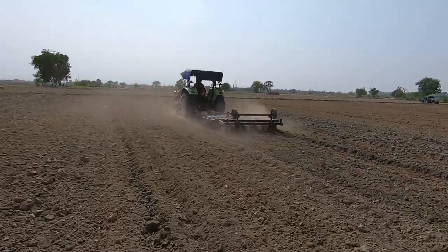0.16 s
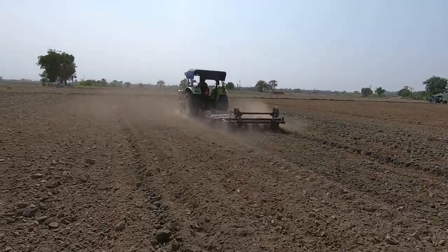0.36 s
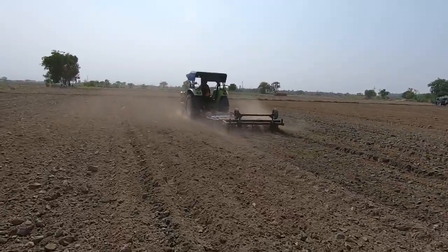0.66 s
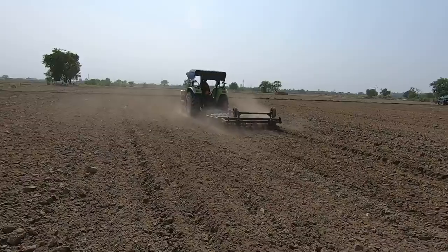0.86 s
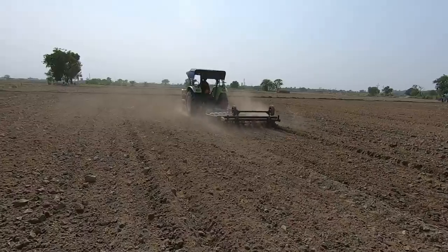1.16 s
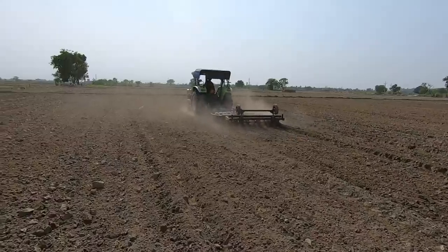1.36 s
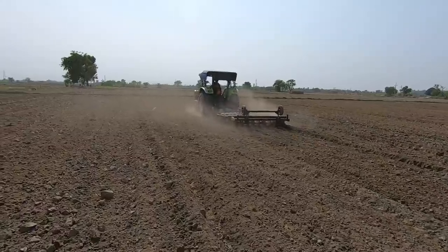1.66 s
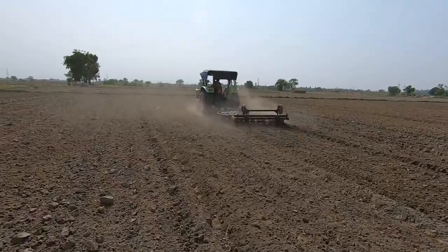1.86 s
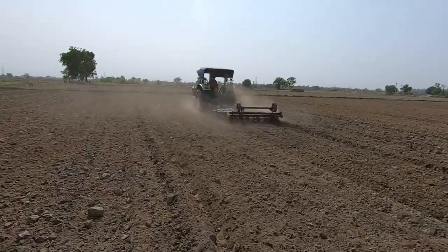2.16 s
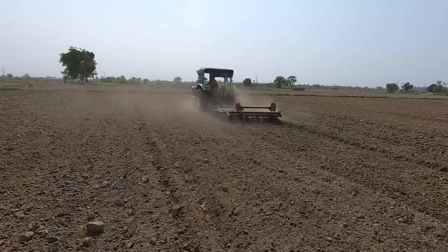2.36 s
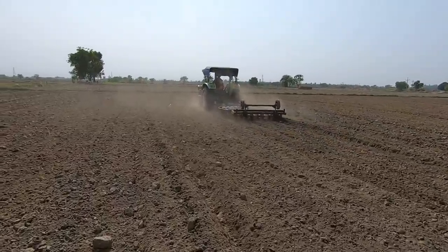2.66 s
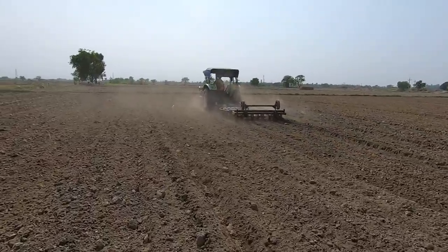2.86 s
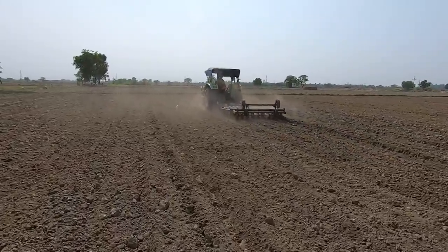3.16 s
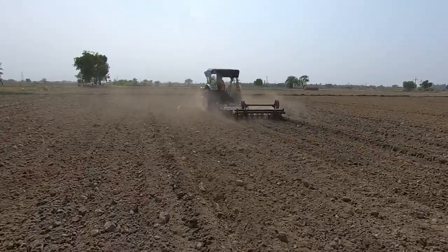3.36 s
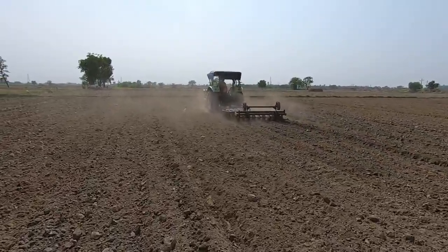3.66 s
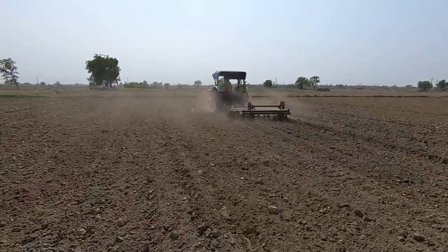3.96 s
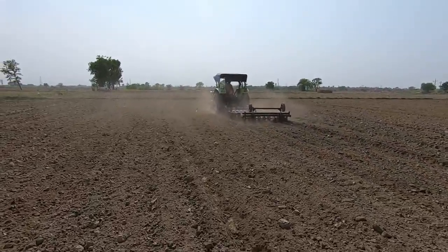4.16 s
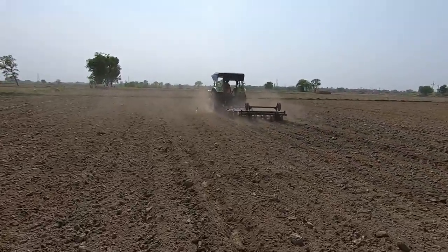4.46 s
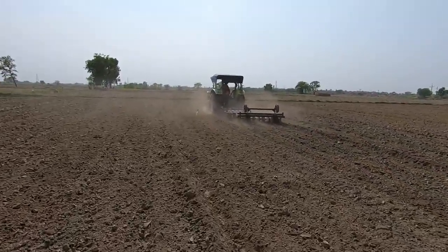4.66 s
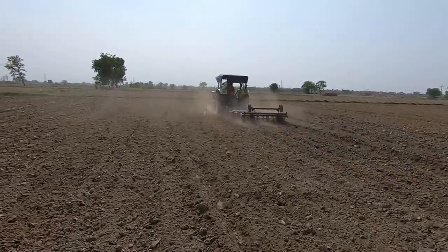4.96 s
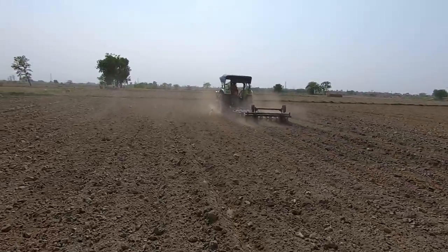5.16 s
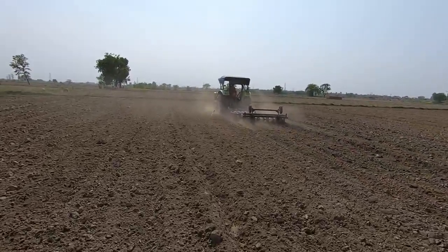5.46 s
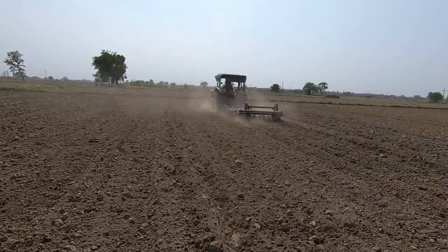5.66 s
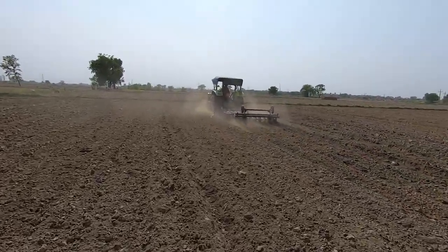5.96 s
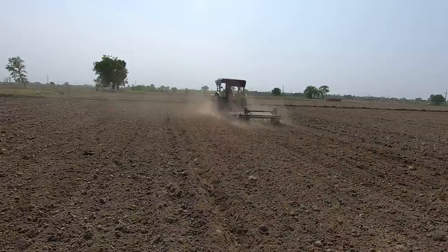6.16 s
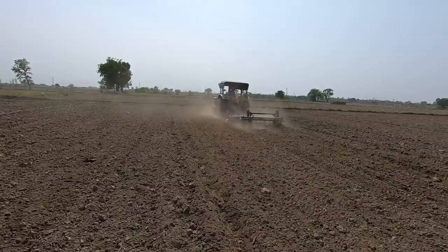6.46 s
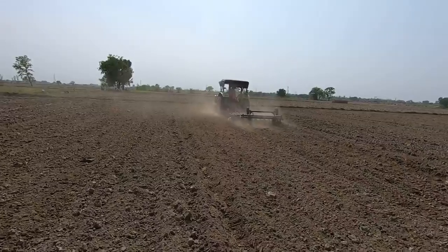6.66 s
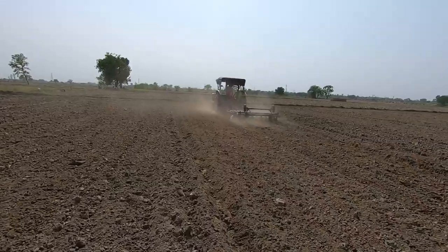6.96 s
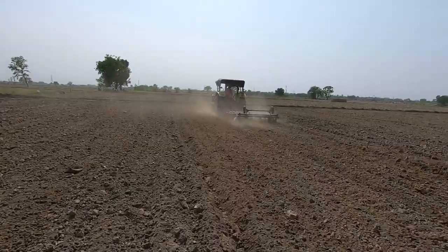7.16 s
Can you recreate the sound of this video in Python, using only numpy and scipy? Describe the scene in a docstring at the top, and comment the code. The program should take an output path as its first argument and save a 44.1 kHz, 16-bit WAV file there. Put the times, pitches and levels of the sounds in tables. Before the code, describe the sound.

A diesel tractor under steady load drones and clatters with a thin gear whine, while wind buffets the microphone and small ticks hit the camera.

```python
"""A four-cylinder diesel tractor pulls a harrow away across a dry field, heard by a hand-held camera.
From the start the exhaust thuds at the firing rate, gears whine, and the block clatters, roars and hisses.
All along, separate noise at the two microphone ports makes wind gusts, and grit snaps and rings the camera
body, hardest halfway through. The exhaust slowly weakens. From the start the sound is a little dull and
narrow; near the end it turns almost fully so, and the exhaust swells briefly before it drops."""
import sys
import numpy as np
from scipy import signal
from scipy.fft import rfft, irfft
from scipy.io import wavfile
from scipy.ndimage import uniform_filter1d

SR = 44100
rng = np.random.default_rng(int(sys.argv[2]) if len(sys.argv) > 2 else 0)


def to_wav(s):
    """Save 16-bit WAV."""
    ch = np.atleast_2d(s).T  # columns
    pcm = np.round(np.clip(ch, -1, 1) * 32767)  # PCM
    wavfile.write(sys.argv[1], SR, pcm.astype(np.int16))


N = 322371
T = np.arange(N) / SR  # time in seconds


def gain_of(db):
    """Turns decibels into a gain."""
    return 10 ** (np.asarray(db) / 20)


def evened(x):
    """Scales a signal to rms 1."""
    return x / np.sqrt(np.mean(x ** 2) + 1e-20)


def read(points, hz):
    """Reads a table of values along a log-frequency axis."""
    point_hz, value = np.transpose(points)
    return np.interp(np.log(hz + 1), np.log(point_hz + 1), value)


def curve(rows, column=1, t=T):
    """Reads one column of a table along time; the end values hold outside the table."""
    columns = np.transpose(rows)
    return np.interp(t, columns[0], columns[column])


def noise(points):
    """Makes steady noise with a given spectrum, rms 1."""
    hz = np.fft.rfftfreq(N, 1 / SR)
    spectrum = rfft(rng.standard_normal(N))
    return evened(irfft(spectrum * gain_of(read(points, hz)), N))


def wander(top_hz):
    """Makes a slow random drift, rms 1, that falls off above top_hz."""
    return noise([(.2, 0), (top_hz, 0), (3 * top_hz, -40), (9 * top_hz, -160)])


# Engine speed. Each row: time in seconds, rate of the gear teeth in Hz.
# There are 32 teeth and 4 firings to an engine cycle.
SPEED = [(0, 431.2), (.38, 432.6), (.72, 430.2), (1.4, 431), (1.85, 429.8), (2.2, 430.4), (2.45, 430.6),
         (2.72, 428.6), (3.05, 430.5), (3.25, 429.7), (3.54, 431.9), (3.7, 428.6), (3.9, 433),
         (4.04, 429.5), (4.33, 431.4), (4.55, 430), (4.85, 431.1), (5.1, 430.2), (5.45, 431.2),
         (5.72, 429.2), (6.4, 429.6), (6.85, 431.4), (7.31, 431.2)]


def cycles():
    """Counts the engine cycles gone by; moving air shakes the arrival a little."""
    return np.cumsum(curve(SPEED)) / SR / 32 + .0004 * wander(6)


# How loud the engine is before the ports. Each row: time in seconds, exhaust level in dB,
# level in dB that the roar, knocks and quieter gear tones follow.
LOUDNESS = [(0, -19.5, -34), (1, -20, -35), (2.5, -20.5, -36), (3.4, -20.5, -35), (5.4, -20.5, -37),
            (6.3, -22, -37.5), (6.8, -22.5, -38.5), (7.04, -24, -34.5), (7.15, -19.5, -34.5),
            (7.31, -25.5, -36)]
# The exhaust's tones. Each row: multiple of the firing rate, level in dB against the firing tone.
EXHAUST_TONES = [(0.25, -47), (0.5, -30), (0.75, -83), (1, 0), (1.25, -24), (1.5, -21.5), (1.75, -24),
                 (2, -8), (2.25, -25), (2.5, -21), (2.75, -27), (3, -17.5), (3.25, -44.5), (3.5, -24),
                 (3.75, -26.5), (4, -18.5), (4.25, -51.5), (4.5, -34.5), (4.75, -40.5), (5, -32),
                 (5.25, -49), (5.5, -36.5), (5.75, -56), (6, -32.5), (6.25, -33.5), (6.5, -33.5),
                 (6.75, -41.5), (7, -32.5), (7.25, -37.5), (7.5, -49), (7.75, -39.5), (8, -30.5)]
# The pipe turns the overtones, and they slip about (cycles per multiple).
EVEN_LEAD, ODD_LEAD, LOOSE = .035, -.025, .004


def exhaust(turns):
    """Each firing is a skewed saw tooth whose shape slips about; unequal cylinders add the tones between."""
    out = np.zeros(N)
    for multiple, db in EXHAUST_TONES:
        is_overtone = multiple > 1
        # multiples between the whole even ones use the odd value too
        lead = (ODD_LEAD if multiple % 2 else EVEN_LEAD) * multiple * is_overtone
        slip = LOOSE * (multiple - 1) * wander(8)
        start = rng.random() if multiple % 1 or multiple > 4 else 0
        level = gain_of(db + 0.89 * is_overtone * wander(5.9))
        out += level * np.sin(2 * np.pi * (4 * multiple * turns + start + lead + slip))
    return np.sqrt(2) * gain_of(curve(LOUDNESS)) * out


# The loudest gear tone, at twice the tooth rate. Each row: time in seconds, level in dB before it wavers.
WHINE = [(0, -39), (.9, -39), (1.5, -41.5), (1.9, -38), (2.7, -40), (3.14, -36), (3.45, -43), (3.62, -38),
         (3.9, -42.5), (5.3, -41), (5.7, -37.5), (6.3, -42.5), (6.85, -45.5), (7.2, -39)]
# The other gear tones. Each row: multiple of the tooth rate, level in dB against the roar's loudness
# curve, wavering in dB.
GEAR_TONES = [(2.75, -19, 3), (3, -17, 2.2), (3.875, -21, 2.2), (4, -16, 2), (4.75, -24, 3), (7, -22, 1.6),
              (8, -20.5, 1.4), (9, -23.5, 1.4), (10.95, -38, 3)]
# Gear tones swell or sink for a while. Each row: multiple of the tooth rate, peak time in seconds,
# length in seconds, change at the peak in dB.
SWELLS = [(3, .3, .6, -8), (3, 4.9, 1.2, 4), (3, 6.8, .5, -4), (3.875, 1.5, 1.2, 4), (3.875, 3.0, .5, 6),
          (3.875, 6.8, .6, -6), (4, .95, .6, 3), (4, 2.9, 1.2, 2), (4, 5.8, .7, 5), (4, 6.5, .3, -5),
          (7, .25, .6, 3), (7, 1.8, .6, 4), (7, 4.3, .3, 5), (7, 5.2, .8, -6), (7, 2.9, .5, 3),
          (7, 6.3, .5, -4), (7, 7.1, .5, -3), (8, 2.35, .35, 5), (8, 3.85, .25, 6), (8, 4.3, .2, 4),
          (8, 5.3, .8, -3), (8, 6.15, .3, 2.5), (8, 1.85, .4, -5), (8, 3.2, .5, -3), (8, 6.9, .7, 4),
          (9, .8, .8, -3), (9, 2.9, 1, 4), (9, 3.9, .3, -6), (9, 4.9, .4, -5), (9, 5.9, 1.1, 6),
          (9, 6.9, .4, -7)]


def gear_tone(turns, multiple, db):
    """A thin tone of meshing teeth, locked to the shaft."""
    return np.sqrt(2) * gain_of(db) * np.sin(2 * np.pi * (32 * multiple * turns + rng.random()))


def gears(turns):
    """Meshing teeth whine in tones that come and go by themselves; the loudest throbs once a cycle."""
    cycle_throb_db = 1.5 * np.sin(2 * np.pi * turns)
    out = gear_tone(turns, 2, curve(WHINE) + .6 * wander(8) + 1.6 * wander(40) + cycle_throb_db)
    for multiple, db, waver_db in GEAR_TONES:
        level_db = curve(LOUDNESS, column=2) + db + waver_db * wander(14)
        for swell_multiple, peak, length, change_db in SWELLS:
            if abs(swell_multiple / multiple - 1) < .015:
                level_db = level_db + change_db * np.exp(-(2 * (T - peak) / length) ** 2)
        out += gear_tone(turns, multiple, level_db)
    return out


# Spectrum of the knocks. Each row: frequency in Hz, relative level in dB per tone.
CLATTER_SPECTRUM = [(430, -62), (520, -59.5), (620, -61.5), (760, -58), (950, -57), (1200, -66),
                    (1500, -57.5), (1800, -68.5), (2200, -65), (2600, -74.5)]
UNEVEN_DB = 4.0  # uneven levels of the knock tones, chance capped at one step up


def clatter(turns):
    """One random pattern of knocks, played once a cycle; tones on the firing rate stand out."""
    order = np.arange(4097)  # multiples of the cycle rate
    order_hz = order * np.mean(curve(SPEED)) / 32
    uneven_db = UNEVEN_DB * np.minimum(rng.standard_normal(4097), 1)
    size = gain_of(read(CLATTER_SPECTRUM, order_hz) + 2.36 * (order % 4 == 0) + uneven_db)
    size *= (order > 32) & (order < 200)
    pattern = irfft(size * np.exp(2j * np.pi * rng.random(4097))) * 4096 * np.sqrt(2)
    knocks = np.interp(turns % 1, np.arange(8192) / 8192, pattern, period=1)
    return knocks * gain_of(0.38 * wander(4.6))


THROB_LAG = .3  # the block noise's throb lags the exhaust by this share of a firing


def firing_beat(turns):
    """Phase of the throb in radians, one turn per firing."""
    return 2 * np.pi * (4 * turns - THROB_LAG)


# Spectrum of the roar. Each row: frequency in Hz, relative level in dB per Hz.
ROAR_SPECTRUM = [(130, -28), (215, -4.5), (250, -13), (400, -6.5), (610, -24.5), (765, -6), (830, -13),
                 (930, -9), (1140, -11.5), (1700, -13), (1920, -15), (2410, -14.5), (2780, -17),
                 (3800, -21.5), (4100, -39), (8000, -120)]


def roar(turns):
    """Fan, intake and block noise that throbs with each firing."""
    wide, hz = noise(ROAR_SPECTRUM), np.fft.rfftfreq(N, 1 / SR)
    middle_band = irfft(rfft(wide) * (hz > 1000) * (hz < 3800), N)
    wide /= np.std(middle_band)  # the middle band sets the level
    beat = firing_beat(turns)
    return wide * gain_of(1.2 * np.sin(beat) + .8 * np.sin(2 * beat) + .4 * wander(12))


# Spectrum of the hiss. Each row: frequency in Hz, relative level in dB per Hz.
HISS_SPECTRUM = [(1500, -69), (3700, -13), (4100, -5.5), (4650, -1), (4900, -4.5), (5300, -5), (6500, -6.5),
                 (7600, -5.5), (8300, -9), (9200, -9.5), (10000, -15), (10700, -36.5), (15000, -40),
                 (15500, -71.5)]
HISS_DB = -9  # against the roar's middle band


def hiss(turns):
    """The higher block noise, with a stronger throb at each firing."""
    throb_db = 1.7 * np.sin(firing_beat(turns))
    return gain_of(HISS_DB + throb_db + 0.84 * wander(23)) * noise(HISS_SPECTRUM)


def patchy(x, patchy_db, size=512, count=40):
    """Lifts and drops patches of the spectrum that drift by; a larger size makes them narrower."""
    overlap = size * 3 // 4
    z = signal.stft(x, SR, nperseg=size, noverlap=overlap)[2]
    patches = uniform_filter1d(rng.standard_normal(z.shape), 5, 0)  # smooth across frequency
    patches = evened(uniform_filter1d(patches, count, 1))  # then across time
    return signal.istft(z * gain_of(patchy_db * patches), SR, nperseg=size, noverlap=overlap)[1][:N]


ROAR_DB, KNOCK_DB = -3.5, 34.0  # gains ahead of the loudness curve
ROAR_PATCH_DB = 1.0  # drifting dusty air lifts and drops patches of the roar
LOOSE_KNOCK_DB = 2.5  # the knock tones come and go


def block(turns):
    """The engine block's roar, hiss and knocks, following one loudness curve."""
    noisy = patchy(roar(turns) + hiss(turns), ROAR_PATCH_DB)
    knocks = patchy(clatter(turns), LOOSE_KNOCK_DB, size=4096, count=8)
    return gain_of(curve(LOUDNESS, column=2)) * (gain_of(ROAR_DB) * noisy + gain_of(KNOCK_DB) * knocks)


# Tyres and discs in soil. Each row: frequency in Hz, relative level in dB per Hz.
RUMBLE_SPECTRUM = [(5, -66.5), (20, -8.5), (40, 9), (65, 5.5), (110, 8), (200, 3), (260, -8.5), (500, -46),
                   (1000, -95)]
RUMBLE_DB = -39.5  # before the ports


def rumble():
    """Tyres and harrow discs in the soil make a low noise that drifts slightly in level."""
    return gain_of(RUMBLE_DB + 0.27 * wander(2.8)) * noise(RUMBLE_SPECTRUM)


# Level difference of the ports. Each row: frequency in Hz, left over right in dB.
LEAN = [(60, -1), (130, 0), (200, -0.5), (350, 0.5), (480, -4), (620, 8.5), (780, -6.5), (950, -7.5),
        (1250, 7), (1750, -4), (2250, 4), (2800, -2.5), (3250, 6), (3800, -8), (4150, -2), (4800, -5.5),
        (7000, -4.5), (8400, -1.5), (9500, 1), (10500, -0.5)]
# Phase difference of the ports. Each row: frequency in Hz, phase in radians, split between the ports.
LEAD = [(400, 0), (540, -.4), (680, .4), (880, .2), (1100, -1), (1400, .35), (1950, -.5), (2450, .2),
        (3000, -.25), (3450, .25), (3900, -.15), (5000, -.25), (6500, -.9), (7800, -3.1), (8200, -3.3),
        (8500, -6), (10500, -6)]
# How alike the ports sound. Each row: frequency in Hz, likeness from 0 to 1.
SAME = [(100, 1), (230, 1), (350, 1), (900, 0.95), (1200, 0.92), (2000, 0.76), (2500, 0.91), (3000, 0.93),
        (3800, 0.86), (4200, 0.92), (4900, .68), (5300, 0.86), (6000, 0.65), (7800, 0.79), (8400, .1),
        (9000, 0.7), (10400, 0.47), (11500, 0.64)]
# How dull and narrow the sound is. Each row: time in seconds, share from 0 to 1.
MUFFLE = [(6.65, 0.33), (6.8, 0.71), (7.0, 0.94), (7.3, 0.98)]
# Colour of the fully dull sound. Each row: frequency in Hz, change in dB.
MUFFLED = [(100, 2.5), (200, 0), (380, 7), (600, 2.5), (1500, -3), (3500, 0.5), (5500, -13.5),
           (7000, -15.5), (9000, -14), (9800, -17.5), (10800, -3)]
# Width of the fully dull sound. Each row: frequency in Hz, share of the width lost.
NARROWED = [(100, 1), (4000, 0.99), (6000, .3)]


def ports(x):
    """Two microphone ports colour and delay the sound differently; late on, they nearly merge and go dull."""
    hz, t, z = signal.stft(x, SR, nperseg=1024, noverlap=768)
    # the same sound backwards serves as scattered sound of like colour
    scattered = signal.stft(x[::-1], SR, nperseg=1024, noverlap=768)[2]
    share = np.clip(curve(MUFFLE, t=t), 0, 1)
    half = (gain_of(read(LEAN, hz) / 2) * np.exp(-.5j * read(LEAD, hz)))[:, None]
    same = np.clip(read(SAME, hz), 0, 1)[:, None]
    left = z * half
    right = (same * z + np.sqrt(1 - same ** 2) * scattered) / half
    width_lost = share * np.clip(read(NARROWED, hz), 0, 1)[:, None]
    middle = (left + right) / 2
    side = (left - right) / 2 * (1 - width_lost)
    pair = np.array([middle + side, middle - side]) * gain_of(share * read(MUFFLED, hz)[:, None])
    return signal.istft(pair, SR, nperseg=1024, noverlap=768)[1][:, :N]


# Grit on the camera body. Each row: time in seconds, ring level in dB before its rise and decay,
# snap level in dB before filtering, middle of the snap's band in Hz, rise time in ms.
TICKS = [(.672, -50, -38, 9500, 9), (.801, -30, -45, 4500, 1), (1.205, -31, -45, 4500, 1),
         (1.743, -30, -45, 4500, 1), (2.307, -27, -42, 4500, 1), (3.489, -19, -42, 4800, 2.5),
         (3.502, -27, -45, 4500, 2), (3.578, -10.5, -19, 3100, 1.1), (4.837, -31, -45, 4500, 1),
         (6.103, -28, -36, 4500, 1), (6.587, -18, -31, 4300, .5), (7.210, -36, -50, 4300, 1)]
BODY_HZ, BODY_T60 = 1250, .023  # pitch of the ring, and seconds to fall by 60 dB
BODY_HUM_DB = -49.5  # before the muffling share takes it down
SNAP_RIGHT = .35  # gain on the right; the snap is nearer the left port


def body():
    """Grit snaps on the shell and rings its bending mode; steady noise stands for the engine's hum in it."""
    ring, snap, t = np.zeros(N), np.zeros((2, N)), np.arange(3000) / SR
    for start, ring_db, snap_db, snap_hz, rise_ms in TICKS:
        at, rise = round(start * SR), max(rise_ms, .1) / 1000
        onset = 1 - np.exp(-t / rise)
        since = np.maximum(t - 2 * rise, 0)  # a slow blow keeps pushing before the ring dies
        decay = gain_of(ring_db - 60 * since / BODY_T60)
        ring[at:at + 3000] += decay * onset * np.sin(2 * np.pi * BODY_HZ * t)
        burst = gain_of(snap_db) * np.exp(-(t / (rise + .0008)) ** 2) * rng.choice([-1., 1.], 3000)
        band = signal.butter(3, [.5 * snap_hz, 1.5 * snap_hz], "band", fs=SR)
        snap[:, at:at + 3000] += signal.lfilter(*band, burst * [[1], [SNAP_RIGHT]])
    hum = noise([(300, -90), (BODY_HZ - 300, -25), (BODY_HZ - 60, 0), (BODY_HZ + 40, 0),
                 (BODY_HZ + 200, -25), (3000, -100)])
    ring += gain_of(BODY_HUM_DB) * hum * (1 - np.clip(curve(MUFFLE), 0, 1))
    # the ports pass little of the snap above this
    snap = signal.sosfilt(signal.butter(14, 9600, fs=SR, output="sos"), snap)
    return ring * np.array([[1], [-1]]) + snap  # bending moves the ports oppositely


# Hard gusts with a short pitch. Each row: peak time in seconds, pitch in Hz, peak level in dB,
# length in seconds.
THUDS = [(0.187, 95, -24, .05), (0.888, 45, -22, .05), (1.688, 90, -25, .05), (5.948, 155, -16, 0.026),
         (5.995, 200, -20.5, 0.033), (6.024, 70, -17, .05), (6.045, 150, -24, 0.026),
         (6.125, 171, -20.5, 0.066), (6.329, 65, -24, .05), (6.6, 151, -21, 0.033),
         (6.631, 240, -22, 0.053), (6.768, 50, -22, .05)]


def thuds():
    """Hard gusts thud: a few low cycles under a smooth hump, on the left port only."""
    left = np.zeros(N)
    shake = .1 * wander(30)  # in cycles; the pitch is unsteady
    for peak, hz, db, length in THUDS:
        hump = gain_of(db) * np.exp(-(2 * (T - peak) / length) ** 2)
        left += hump * np.sin(2 * np.pi * (hz * (T - peak) + rng.random() + shake))
    return left * np.array([[1], [0]])


# Wind gusts. Each row: peak time in seconds, buffeting level in dB over both ports together,
# length in seconds, left port over right in dB, upper part against the low part in dB.
GUSTS = [(0.192, -24, 0.18, 9, -2.5), (.64, -37, 0.071, 1, -6), (0.863, -20.5, .1, 14, 2),
         (0.99, -23.5, 0.046, 0, -2), (1.105, -27.5, 0.055, 2, -7), (1.294, -21.5, 0.1, 3, -6),
         (1.43, -24.5, 0.1, 6, 1), (1.68, -22, .08, 5, -4), (1.92, -27, .06, 4, -9),
         (2.077, -23, 0.05, -12, 1), (2.28, -25, .06, -2, -7), (2.388, -24.5, 0.08, 13, -1),
         (2.457, -26, .04, 9, 1), (2.534, -23.5, .07, 9, -2), (2.655, -25, 0.089, 7, -4),
         (3.107, -22.5, 0.13, 9, -2), (3.193, -28.5, 0.064, 13, -3), (3.543, -25.5, 0.11, 1, -5),
         (3.693, -23, 0.098, 12, -3), (3.826, -26, 0.046, 4, -6), (3.997, -29.5, .08, 11, -8),
         (4.221, -24, .14, 17, -4), (4.397, -30, .07, 7, -8), (4.815, -27, 0.065, 13, -10),
         (4.97, -21, .09, 7, -3), (5.354, -32.5, .1, 0, -10), (5.517, -25, 0.15, 4, -8),
         (5.83, -25.5, 0.098, -1, -6), (5.898, -22, .04, 8, 1), (5.952, -22, 0.05, 10, 1),
         (6.02, -22, .07, 14, 1.5), (6.128, -24.5, 0.09, 12, 0), (6.22, -26, .05, 13, 1),
         (6.315, -21, 0.08, 19, 0), (6.465, -25, .05, 10, -3), (6.63, -22, 0.055, 12, 2.5),
         (6.748, -23, 0.089, 8, -7), (6.86, -25, 0.056, 3, -2), (6.92, -30, .06, 2, -4),
         (7.22, -36, .2, -4, -2)]
# Spectrum of the wind. Each row: frequency in Hz, relative level in dB per Hz.
WIND_SPECTRUM = [(8, -30.5), (22, -4), (45, -2), (100, -1), (200, -8), (270, -12), (340, -19.5),
                 (450, -28.5), (700, -36.5), (900, -56.5), (1500, -120)]
# Wind between the gusts: level, swaying, left over right, upper part against the low part.
BREEZE_DB, BREEZE_SWAY_DB, BREEZE_LEAN_DB, BREEZE_UPPER_DB = -30.5, 4.5, 4, -12
# A gust's fall at half its length from the peak; the upper part stops more abruptly.
GUST_EDGE_DB, UPPER_EDGE_DB = -4, -6.5


def port_powers(db, lean_db):
    """Shares a wind level between the left and right ports, as power."""
    left = 1 / (1 + gain_of(-2 * lean_db))
    return gain_of(2 * db) * np.array([[left], [1 - left]])


def wind():
    """Lumpy low buffeting, unrelated at the two ports; each gust peaks sharply, and some reach higher."""
    clear = 1 - np.clip(curve(MUFFLE), 0, 1)
    lower = port_powers(BREEZE_DB + BREEZE_SWAY_DB * wander(2.8), BREEZE_LEAN_DB) * clear ** 2
    upper = lower * gain_of(2 * BREEZE_UPPER_DB)
    for peak, db, length, lean_db, upper_db in GUSTS:
        away = abs(T - peak) / (abs(length) / 2)
        lower = lower + port_powers(db + GUST_EDGE_DB * away, lean_db)
        upper = upper + port_powers(db + upper_db + UPPER_EDGE_DB * away ** 2, lean_db)
    both = []
    for low_gain, high_gain in zip(np.sqrt(lower), np.sqrt(upper)):
        full = noise(WIND_SPECTRUM) * gain_of(1.1 * wander(35))
        low = signal.filtfilt(*signal.butter(2, 120, fs=SR), full)
        both.append(low_gain * low + high_gain * (full - low))
    return np.array(both)


def scene():
    """Tractor and harrow through the ports, then grit and wind at the camera."""
    turns = cycles()
    tractor = exhaust(turns) + gears(turns) + block(turns) + rumble()
    return ports(tractor) + body() + thuds() + wind()


def record(dry):
    """Limits the band: little passes above 15.1 kHz."""
    low_pass = signal.firwin(255, 15100, window=("kaiser", 9), fs=SR)
    return signal.oaconvolve(dry, low_pass[None], "same")


dry = scene()
out = record(dry)
to_wav(out)
```